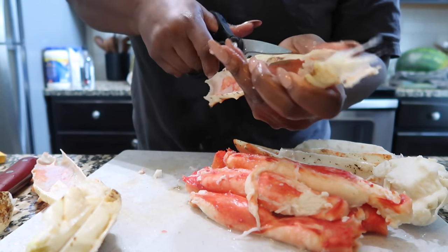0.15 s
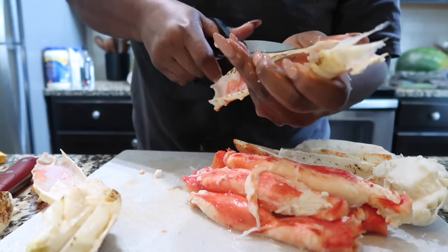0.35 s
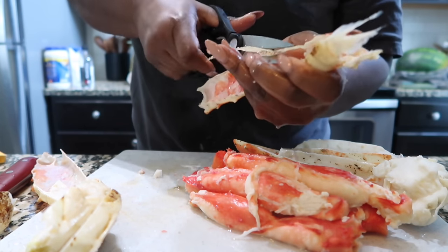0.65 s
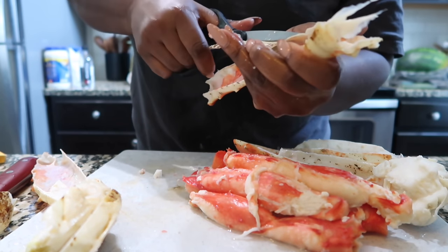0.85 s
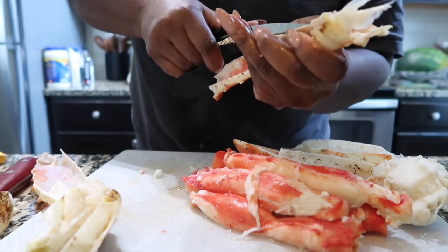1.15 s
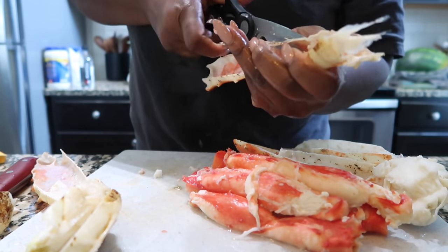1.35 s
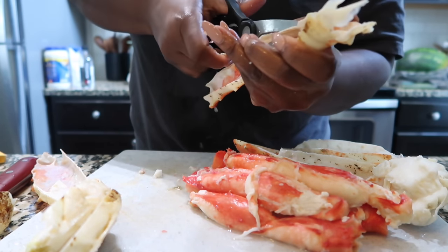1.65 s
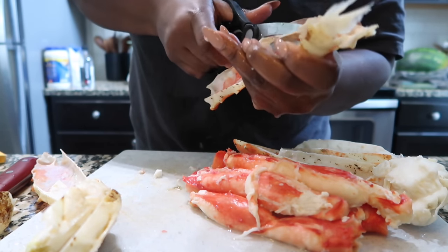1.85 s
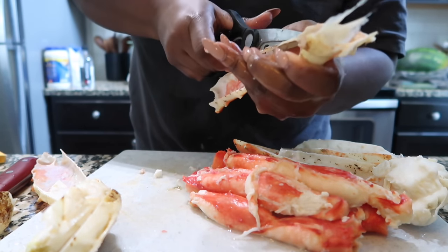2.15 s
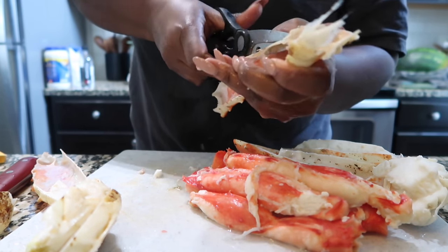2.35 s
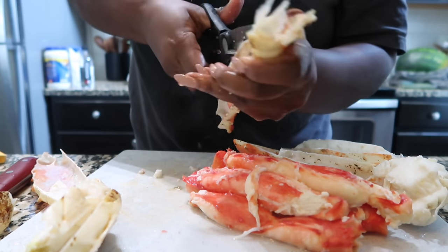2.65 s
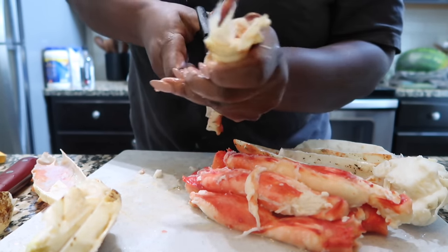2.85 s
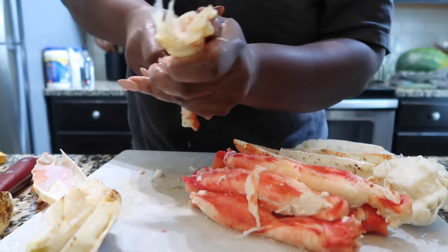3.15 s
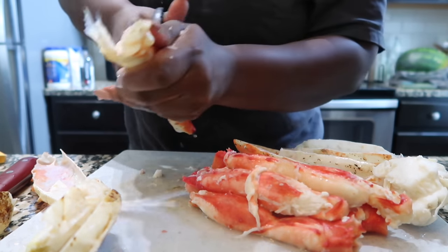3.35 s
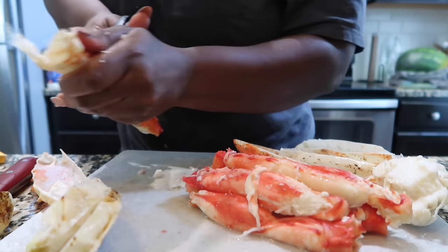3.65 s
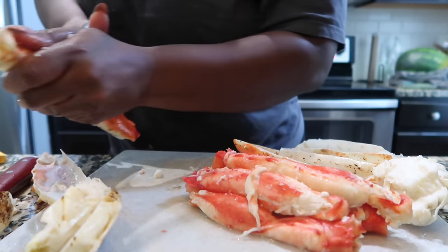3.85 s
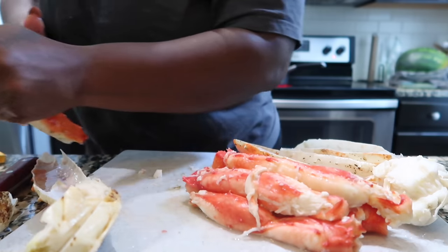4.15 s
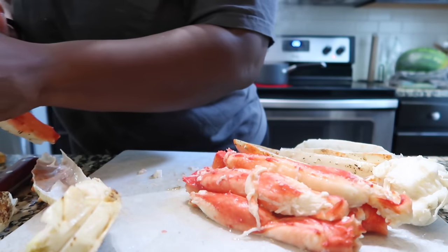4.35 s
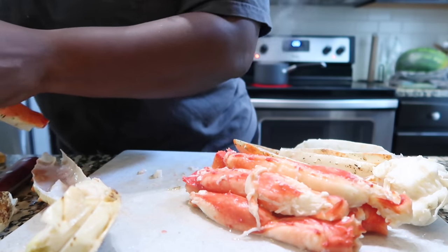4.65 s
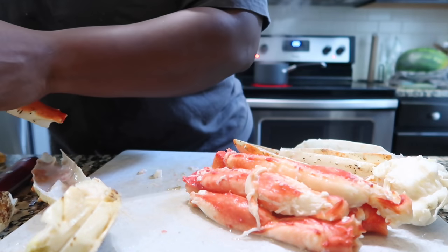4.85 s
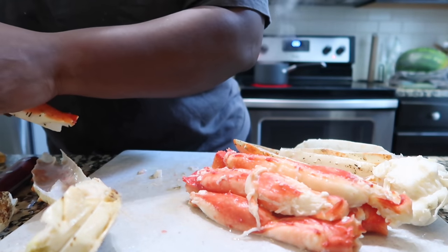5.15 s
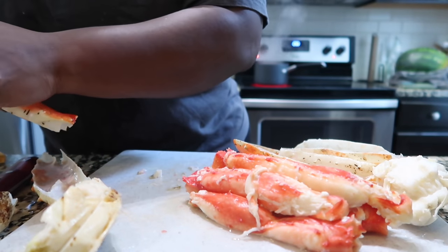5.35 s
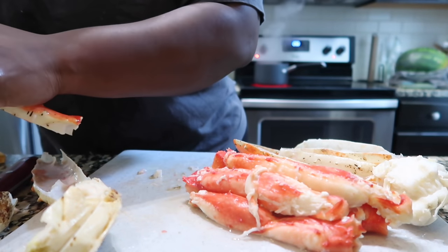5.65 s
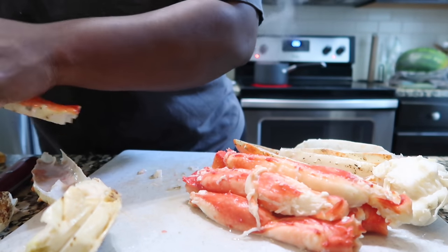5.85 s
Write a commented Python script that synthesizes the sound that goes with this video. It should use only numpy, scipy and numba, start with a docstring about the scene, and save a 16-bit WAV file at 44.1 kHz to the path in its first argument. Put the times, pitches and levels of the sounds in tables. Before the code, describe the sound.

Kitchen shears snip through crab shell, then hands crack it apart with wet ticks and a short creak, over a low fan rumble.

```python
"""A fan rumbles throughout in a hard kitchen. 0.1-2 s: shears bite through a crab leg; short
fractures ring the hollow shell and the blades slide on it. From 2.6 s: hands bend and rub the wet
shell, which cracks and ticks. At 5.6 s it is prised, creaks by stick and slip, then cracks.
A small camera with two close ports and gain control hears it."""
import sys
import numpy as np
from scipy import signal
from scipy.fft import rfft, irfft, next_fast_len
from scipy.io import wavfile
from scipy.ndimage import uniform_filter1d, map_coordinates
from numba import njit

SR = 44100
rng = np.random.default_rng(int(sys.argv[2]) if len(sys.argv) > 2 else 0)


def dump_mix(stems):
    """Bounce the given channels to the path in sys.argv[1] as a 16-bit WAV at rate SR."""
    frames = np.atleast_2d(stems).T  # one column per channel
    limited = np.clip(frames, -1, 1)  # hard clip at full scale
    pcm = np.round(limited * 32767).astype(np.int16)
    wavfile.write(sys.argv[1], SR, pcm)


N = 264712
SIZE = 4096  # samples per grain
HZ, T = np.fft.rfftfreq(SIZE, 1 / SR), np.arange(SIZE) / SR

# Modes of the hollow leg: f/Hz, width/Hz, level/dB
LEG_MODES = [(1040, 360, -8.5), (1223, 54, -7), (2115, 186, 5.5), (2333, 68, 2), (2680, 280, -4),
             (3860, 120, -4), (4930, 72, -2.5), (5610, 1050, -0.5), (7180, 980, -5), (10680, 1040, -7.5),
             (12850, 1000, -9.5)]
# Modes of the opened shell: f/Hz, width/Hz, level/dB
OPEN_MODES = [(770, 180, -9.5), (1107, 57, -6), (1442, 124, -0.5), (1820, 128, 1.5), (2310, 210, -6),
              (2940, 200, 5), (3130, 265, 0.5), (3690, 90, -7), (4090, 75, -12.5), (4560, 60, -14.5),
              (5620, 160, -17), (6500, 7200, -28.5), (9250, 990, -24)]


def undb(db):
    """dB to gain."""
    return 10 ** (np.asarray(db) / 20)


def level(x, db):
    """Set the rms level."""
    return x * undb(db) / np.sqrt(np.mean(x ** 2))


def add(out, start_s, x):
    """Mix x into out."""
    i = int(start_s * SR)
    out[i:i + len(x)] += x[:N - i]


def walk(rate_hz):
    """Random steps, smoothed twice."""
    hold = int(SR / rate_hz)
    steps = np.repeat(rng.standard_normal(N // hold + 1), hold)
    return uniform_filter1d(uniform_filter1d(steps, hold), hold)[:N]


def grit(per_s, spread_db):
    """Tiny breaks at random moments, a few stronger than the rest."""
    hits = rng.random(SIZE) < per_s / SR
    strength = undb(spread_db * rng.exponential(1, SIZE))
    return (hits * strength + 1e-4) * rng.standard_normal(SIZE)


def body(modes, scatter_db=0):
    """Modal response; each blow lands elsewhere and drives the modes differently."""
    out = 0
    for k, (hz, width_hz, db) in enumerate(modes):
        gain = (-1) ** k * undb(db + scatter_db * rng.standard_normal())
        centre_hz = hz * (1 + .012 * rng.standard_normal())
        damping = 1j * HZ * width_hz
        out = out + gain * damping / (centre_hz ** 2 - HZ ** 2 + damping)
    return out / (1 + (620 / (HZ + 1)) ** 6)  # small pieces radiate no bass


def ring(push, response, low_db, high_db):
    """Drive a body; set low and high band energy re the mid band (unit power for 1 ms)."""
    low, high = 1 / (1 + (HZ / 1500) ** 6), 1 - 1 / (1 + (HZ / 4500) ** 8)
    out = 0
    for weight, db in ((low, low_db), (1 - low - high, 0), (high, high_db)):
        part = irfft(rfft(push) * response * weight)
        out = out + undb(db) * part / np.sqrt(np.sum(part ** 2) * 1000 / SR)
    return out


def air_noise(spectrum, rms_db):
    """Half-octave noise bands that swell together and flicker alone."""
    size = next_fast_len(N)
    hz = np.fft.rfftfreq(size, 1 / SR)[1:]
    knot_hz, knot_db = np.transpose(spectrum)
    colour = undb(np.interp(np.log(hz), np.log(knot_hz), knot_db, -90, -90))
    air = rfft(rng.standard_normal(size))[1:] * colour
    out, swell_db = 0, .8 * walk(.66)
    for octave in np.arange(4, 14.5, .5):
        share = np.clip(1 - 2 * np.abs(np.log2(hz) - octave), 0, 1)
        out = out + undb(swell_db + 1.2 * walk(6)) * irfft(np.r_[0, air * share], size)[:N]
    return level(out, rms_db)


def fan():
    """Low rumble of moving air, as (mid, side)."""
    # Noise common to both ports: f/Hz, relative density/dB
    mid_spectrum = [(12, -60), (26, -18.5), (42, -26.5), (62, -13), (103, 0), (183, -4.5), (278, -16),
                    (445, -18.5), (497, -22.5), (600, -29.5), (914, -21.5), (1020, -28.5), (1590, -28),
                    (1930, -30.5), (11100, -52.5), (15000, -76)]
    # Noise opposite at the ports: f/Hz, relative density/dB
    side_spectrum = [(12, -67), (20, -41), (247, -3.5), (419, -2.5), (482, -7), (1250, -16.5), (1510, -20),
                     (2500, -27), (2960, -19), (12300, -22.5), (14500, -33), (15800, -49)]
    return air_noise(mid_spectrum, rms_db=-40.5), air_noise(side_spectrum, rms_db=-60.5)


def fractures(events, modes, rise_share, width_hz, pitch_db, bare_db, edge_hz):
    """A crack runs: tiny breaks swell, peak and fade, ringing the shell and the piece's two pitches."""
    out = np.zeros(N)
    peak_s, medium_db = .02, -24
    ms = (T - peak_s) * 1000
    bare_crack = undb(bare_db) * 1j * HZ / (700 + 1j * HZ) / (1 + 1j * HZ / edge_hz) ** 2
    for at_s, db, length_ms, low_db, high_db, hz, second_hz, second_db in events:
        share = np.clip(rise_share + .028 * (db - medium_db), .1, .7)  # stronger ones build up longer
        rise_ms, fade_ms = max(share * length_ms, .3), max((1 - share) * length_ms - .8, .4)
        envelope = np.exp(-np.where(ms < 0, (abs(ms) / rise_ms) ** 1.46, (abs(ms) / fade_ms) ** .69))
        piece = body(modes, scatter_db=2) + bare_crack
        piece += body([(hz, width_hz, pitch_db)]) + body([(second_hz, width_hz, second_db)])
        # The camera keeps less top treble on faint ticks.
        top_cut_hz = 23000 * 2 ** ((db + high_db - medium_db) / 25)
        piece /= 4.5 + (HZ / top_cut_hz) ** 6
        main_break = 1.17 * np.exp(-(ms / .044) ** 2)
        push = (grit(18000, 1) + main_break) * envelope
        add(out, at_s - .0005 - peak_s, undb(db) * ring(push, piece, low_db, high_db))
    return out


def snips():
    """Each bite of the blades fractures shell and rings the leg."""
    # Bites: t/s, level/dB, length/ms, low band/dB, high band/dB, f1/Hz, f2/Hz, f2 level/dB
    bites = [(0.1205, -33.5, 5, -27, -17, 2800, 3750, 2), (0.1285, -23, 4.4, -35, -15, 2340, 2620, 3),
             (0.1518, -31, 2.4, -23, -9, 2200, 2750, 5), (0.1565, -36, 3.1, -22, -4.5, 2680, 5830, 8),
             (0.1912, -14.5, 10.5, -11.5, -3.5, 2650, 2200, 8), (0.2456, -32.5, 2.7, -2, -7, 2400, 2750, 6),
             (0.2555, -20.5, 5.4, -19, -7, 2300, 6000, 10.5),
             (0.4266, -25.5, 3.7, -12, -36, 2080, 2830, -11), (0.4345, -35, 5.5, -9, -16, 2300, 2850, 0),
             (0.474, -42, 5.5, -10, -20, 2200, 2850, 3), (0.4948, -39, 6.3, -21, -10, 2220, 2850, 9),
             (0.7041, -27, 4.9, -9, -18, 2210, 2700, 12), (0.9553, -28, 4, -20, -6.5, 2077, 2670, -8),
             (0.9851, -26, 3.7, -17, -8.5, 2090, 3680, 12.5),
             (1.0278, -28.5, 6.1, -19, -7.5, 1930, 3600, 2),
             (1.0849, -21.5, 5.6, -7.5, -6.5, 1960, 3700, 3), (1.1349, -14, 4.2, -10, -2, 1960, 3000, 5.5),
             (1.2827, -38.5, 7.9, -8, -12, 3700, 2800, 7), (1.312, -36, 5.8, -8, -20, 2867, 3690, 7),
             (1.3286, -31, 4.0, -8, -15, 2000, 1300, 1), (1.349, -31.5, 4.1, -16, -2, 2240, 2710, 6),
             (1.3567, -34, 2.7, -6, -15, 3650, 1340, 2), (1.793, -36.5, 2.8, -34, 4.5, 2190, 3700, 8),
             (1.8898, -25, 4.7, -4, -4.5, 2060, 3730, 13.5), (1.9415, -17.5, 3.2, -12, -2, 2220, 3540, -1),
             (1.9445, -22, 4.6, -7.5, -0.5, 2160, 3540, 5), (1.973, -30, 6.5, -6, 4, 2230, 990, 5),
             (1.9882, -16.5, 5.6, -7.5, 1, 2180, 6060, 11), (2.0140, -10, 5.2, -6, -4.5, 2070, 2600, 8.5)]
    return fractures(bites, LEG_MODES, rise_share=.33,
                     width_hz=240, pitch_db=10.5, bare_db=-21.5, edge_hz=5100)


def rubs():
    """Blades and fingers slide on shell: dense slips through its modes and a broad hump."""
    # Slides: start/s, length/s, level/dB, high band/dB
    slides = [(0.121, 0.035, -65, -6), (0.206, 0.035, -53, 9), (0.43, 0.1, -56.5, -11),
              (0.698, 0.06, -60, -16), (1.25, 0.064, -57, -11), (1.541, 0.096, -47.5, -8.5),
              (2.688, 0.097, -58, -8.5), (3.11, 0.046, -52, -5), (3.315, 0.052, -54, -9),
              (3.63, 0.062, -56.5, -2), (4.059, 0.083, -63.5, -23), (5.082, 0.09, -57, -41),
              (5.184, 0.037, -54, -1), (5.295, 0.046, -55, -23), (5.496, 0.054, -54, 7),
              (5.751, 0.13, -42.5, -7)]
    out, opened_s = np.zeros(N), 5
    window = np.sin(np.pi * np.clip(T / .04, 0, 1)) ** 2
    rolloff = 1 + (HZ / 12400) ** 6  # soft skin gives little top
    for at_s, length_s, db, high_db in slides:
        modes = LEG_MODES if at_s < opened_s else OPEN_MODES
        low_db = -17 - .52 * high_db  # soft slips sound duller
        for offset_s in np.arange(0, length_s, .02):
            slips = grit(3500, 1.2) * window
            response = (body(modes, scatter_db=6.7) + body([(2540, 1800, .5)])) / rolloff
            grain = level(ring(slips, response, low_db, high_db), db)
            swell = np.sin(np.pi * np.clip((offset_s + .017) / length_s, .12, .88))
            add(out, at_s + offset_s - .01, swell * grain)
    return out


def cracks():
    """Pieces bent in the fingers break and ring, each mostly at its own pitches."""
    # Snaps: t/s, level/dB, length/ms, low band/dB, high band/dB, f1/Hz, f2/Hz, f2 level/dB
    snaps = [(2.6729, -39.5, 8.5, -11, -16, 2065, 2900, -6), (2.7287, -35, 2.56, -2, -22, 1570, 1100, -3),
             (2.7494, -33, 5.3, -6, -16, 2390, 1500, -8), (3.0785, -37, 5.6, -12, -13, 3700, 1900, 9),
             (3.0858, -17.5, 6.9, -5, -6, 2500, 720, 4), (3.328, -36, 11, -18, -13, 2310, 2900, -1),
             (3.3453, -36, 13, -13, -7, 1960, 2910, -6), (3.3686, -22, 4.1, -13, -20, 1800, 2350, 4),
             (3.5618, -23, 4.1, -22, -1, 5670, 4800, 7), (3.6276, -30.5, 2.7, -22, 3, 4980, 5990, -5),
             (3.6508, -36.5, 11, -19, 1, 4730, 5900, -6), (3.8517, -30.5, 5, -5.5, -21, 1900, 2140, -6),
             (4.0746, -31.5, 8, -12, -22, 2896, 2220, -16), (4.2364, -43, 15, 3, -19, 1920, 1200, -5),
             (4.2948, -43.5, 4.9, 1, 2.5, 3800, 2300, -1), (4.5614, -41, 19, 3.5, -9, 1900, 1100, 7),
             (4.8088, -37, 7.2, -3.5, -11, 2540, 4200, -8), (4.8816, -38.5, 11.3, -8, -17, 2950, 1500, 6),
             (5.1872, -42, 3.56, -8, -25, 2500, 3080, 2), (5.1941, -31.5, 3, -9, -11, 3140, 5140, 11),
             (5.2066, -34, 8.2, -8, -15, 1460, 3180, -2), (5.26, -45, 7.2, 7, -25, 2500, 990, 11),
             (5.2784, -28.5, 3, -6.5, -33, 3040, 1460, -2), (5.2874, -26.5, 3.9, -10, -23, 1950, 3200, -5),
             (5.3363, -41, 8.6, -4, -29, 2930, 1600, -8), (5.398, -44.5, 7.1, 6.5, -25, 2500, 1052, 7),
             (5.5629, -34, 5.2, -11, -14, 2900, 2210, 0), (5.8356, -16, 6.8, -9.5, -2.5, 3410, 2470, 0),
             (5.9717, -36.5, 8.2, -3, -1, 2150, 5840, -9)]
    return fractures(snaps, OPEN_MODES, rise_share=.31,
                     width_hz=320, pitch_db=9.9, bare_db=-3, edge_hz=9600)


def wet_ticks(count=32, from_s=2.65, to_s=5.55):
    """Wet shell and meat shift in the fingers with faint, soft ticks."""
    ticks = []
    for when, strength, shape in rng.random((count, 3)):
        at_s = from_s + (to_s - from_s) * when
        db = -50 - 1.5 * np.log(1 - .95 * strength)
        length_ms, hz, second_hz = 5 + 6 * shape, 1800 + 2200 * shape, 900 + 900 * when
        ticks.append((at_s, db, length_ms, -4, -9.5, hz, second_hz, 0))
    return fractures(ticks, OPEN_MODES, rise_share=.31,
                     width_hz=400, pitch_db=5.5, bare_db=-13, edge_hz=9600)


def creak():
    """Prised shell sticks and slips: the longer an edge sticks, the harder it lets go."""
    # Prising: t/s, force/dB, lower modes/dB, shift of upper modes/%
    prising = [(5.584, -15, 2.5, 2), (5.615, -14.5, 2.5, 3.5), (5.659, -11, -17, -2.5),
               (5.70, -10.5, -12, -2.5), (5.742, -13, -11, -2), (5.756, -17.5, -15, -5.5)]
    # Time between slips: t/s, stick/ms
    sticking = [(5.5842, 8.3), (5.5955, 5.07), (5.6126, 3.93), (5.6626, 11.31), (5.6995, 6.22),
                (5.757, 5.1)]
    knot_s, *curves = np.transpose(prising)
    low = 1 / (1 + (HZ / 2100) ** 8)
    # A slip takes a moment and moves little air.
    contact = 1 / (1 + (HZ / 9000) ** 4) / (1 + (800 / (HZ + 1)) ** 4)
    delay_s = .0016 * np.exp(-((np.minimum(HZ, 3500) - 2700) / 1400) ** 2)  # main modes build up last
    contact = contact * np.exp(-2j * np.pi * np.cumsum(delay_s) * HZ[1])
    ms = T * 1000 - 1
    jerk = np.exp(-(ms / .055) ** 2)
    out, at_s = np.zeros(N), sticking[0][0]
    while at_s < sticking[-1][0]:
        stick_ms = np.interp(at_s, *np.transpose(sticking))
        force_db, lower_db, shift_pct = (np.interp(at_s, knot_s, curve) for curve in curves)
        chatter = .48 * np.gradient(grit(25000, 1)) * (ms > -.5) * np.exp(-ms / 2.2)
        # The widening gap shifts the upper modes.
        bent = [(hz * (1 + shift_pct / 100 * (hz > 2500)), width, db) for hz, width, db in OPEN_MODES]
        response = (1 - low + low * undb(lower_db)) * body(bent, scatter_db=1) * contact
        slip = ring(jerk + chatter, response, low_db=-10.5, high_db=-9)
        force = undb(force_db + .36 * rng.standard_normal()) * (stick_ms / 6) ** .33
        add(out, at_s - .0035, force * slip)
        at_s += stick_ms / 1000
    return out


def kitchen(x, stretch=1):
    """Tiles and cupboards return a short diffuse tail, duller as it fades."""
    # Reverberation bands: f/Hz, T60/s, level/dB
    bands = [(530, 0.31, -30), (903, 0.16, -19.5), (1990, 0.28, -21.5), (2980, 0.36, -23),
             (4840, 0.36, -21), (8300, 0.14, -15), (12800, 0.073, -24)]
    t, tail = np.arange(SR // 2) / SR, 0
    for hz, t60_s, db in bands:
        bandpass = signal.butter(2, [hz / 1.33, hz * 1.43], "band", fs=SR, output="sos")
        noise = level(signal.sosfilt(bandpass, rng.standard_normal(len(t))), db)
        tail = tail + noise * undb(-60 * t / t60_s / stretch) / np.sqrt(t60_s * SR / 14)
    onset = np.clip(t / .0019 - .3, 0, 1)
    return signal.fftconvolve(x, tail * onset)[:N]


def counter(x):
    """First echoes off board and counter."""
    echoes = rng.standard_normal(1600) * np.exp(-np.arange(1600) / 260)
    return signal.fftconvolve(x, level(echoes, -41))[:N]


def scene():
    """Left and right at two close ports; the shell differs between them mainly in the treble."""
    # Direction of the shell: t/s, lead of left port/us
    lead_us = [(0, -17), (2.1, -23), (3.0, 31), (3.6, 23), (5.5, 66.5), (6, 13)]
    shell = snips() + cracks() + rubs() + creak() + wet_ticks()
    n = np.arange(N)
    shift_samples = np.interp(n / SR, *np.transpose(lead_us)) * 1e-6 * SR / 2
    left, right = (map_coordinates(shell, [n + sign * shift_samples], order=3) for sign in (1, -1))
    apart = 1.15 * (left - right) / 2 + .12 * shift_samples * shell  # delay and shading
    apart += counter(shell) + undb(-4) * kitchen(shell, stretch=1.42)  # tail longer in side than mid
    treble = signal.butter(1, [3600, 17000], "band", fs=SR, output="sos")
    fan_mid, fan_side = fan()
    side = signal.sosfiltfilt(treble, apart) + fan_side
    mid = (left + right) / 2 + kitchen(shell) + fan_mid
    return np.array([mid + side, mid - side])


@njit
def gain_control(peak, attack_s, release_s, threshold, slope):
    """Gain falls while the followed level exceeds the threshold."""
    gain, envelope = np.ones(len(peak)), 0.
    for i in range(len(peak)):
        lag_s = attack_s if peak[i] > envelope else release_s
        envelope += (peak[i] - envelope) / (lag_s * SR)
        if envelope > threshold:
            gain[i] = (threshold / envelope) ** slope
    return gain


def record(dry):
    """Gain control ducks after loud sounds and recovers slowly; low-pass at 15.9 kHz."""
    peak = np.abs(dry).max(axis=0)
    gain = gain_control(peak, attack_s=.0071, release_s=.3, threshold=undb(-25), slope=.37)
    lowpass = signal.ellip(10, .2, 80, 15900, fs=SR, output="sos")
    return signal.sosfilt(lowpass, dry * gain)


dry = scene()
out = record(dry)
dump_mix(out)
```